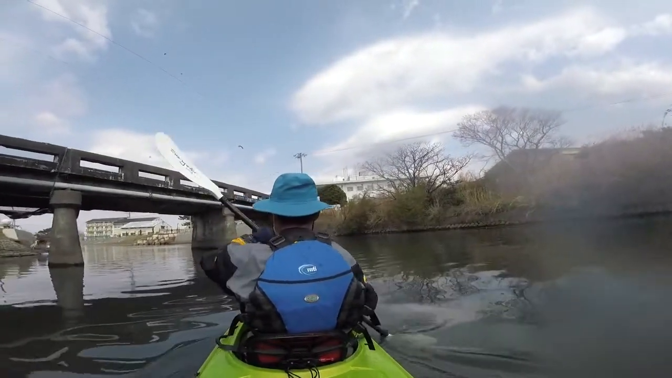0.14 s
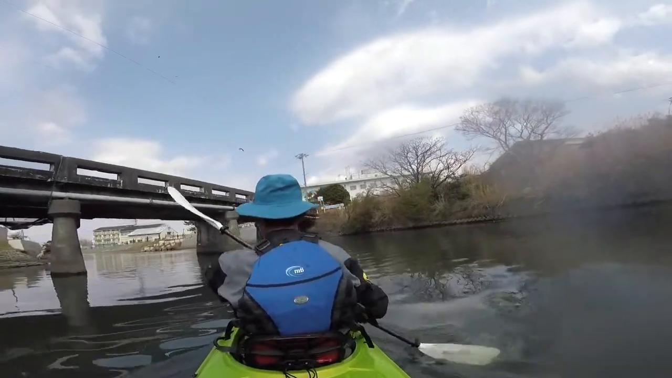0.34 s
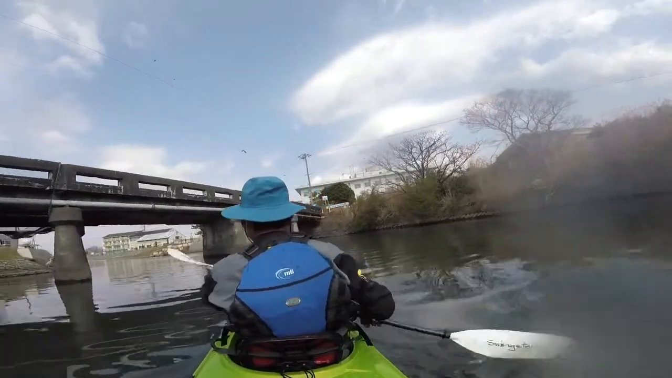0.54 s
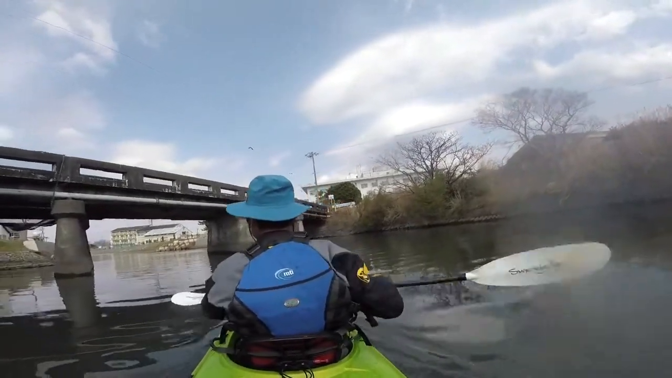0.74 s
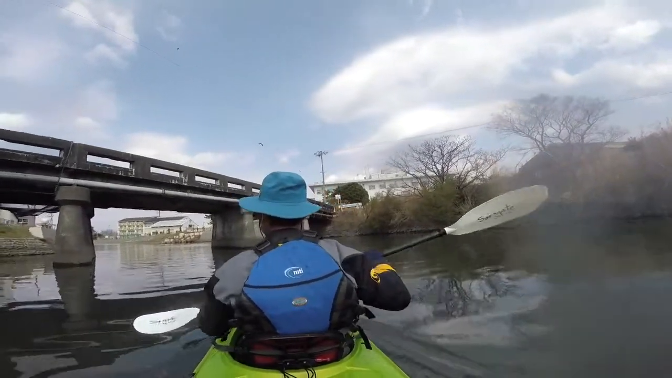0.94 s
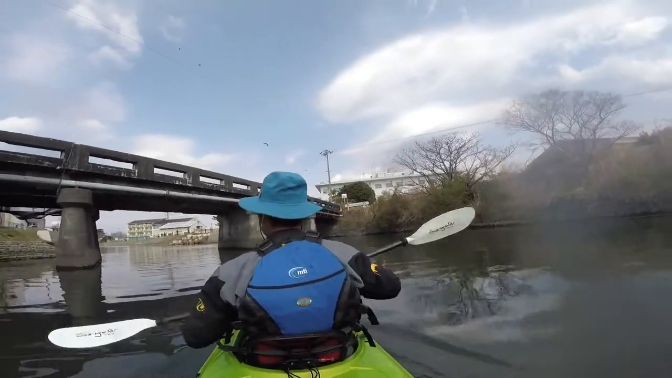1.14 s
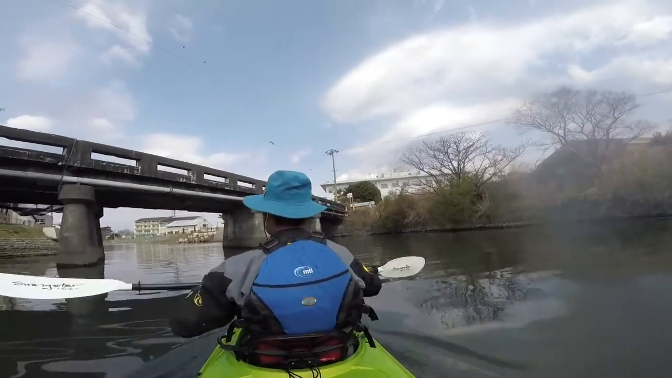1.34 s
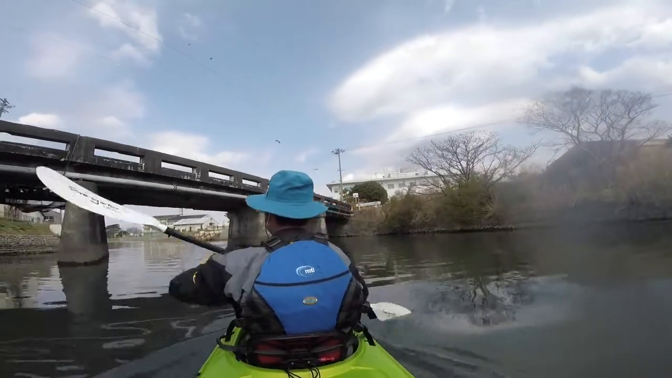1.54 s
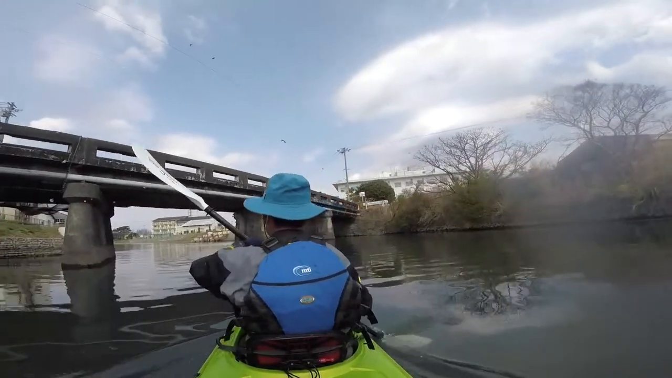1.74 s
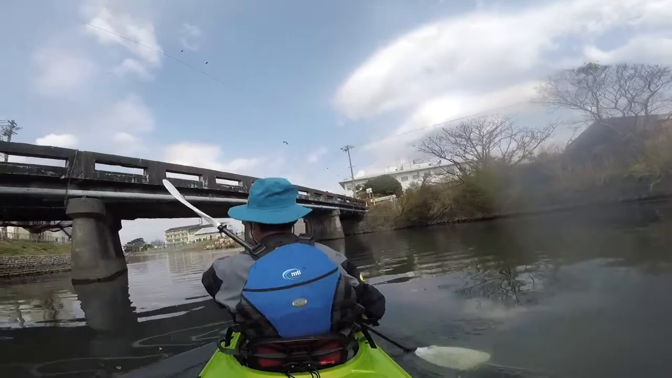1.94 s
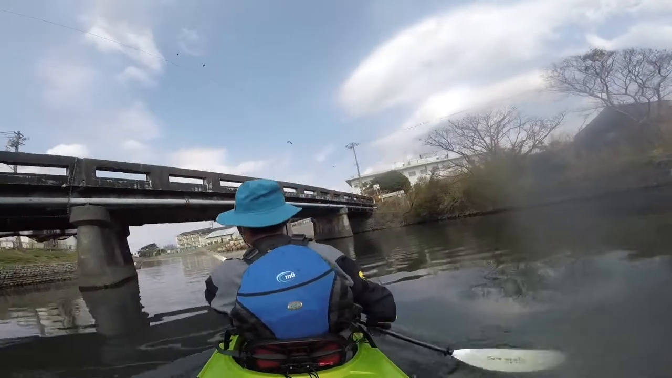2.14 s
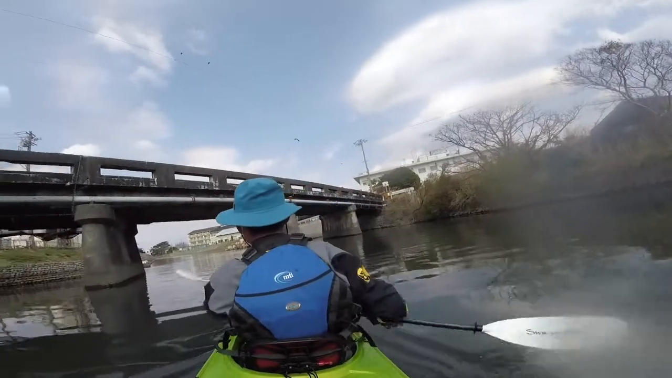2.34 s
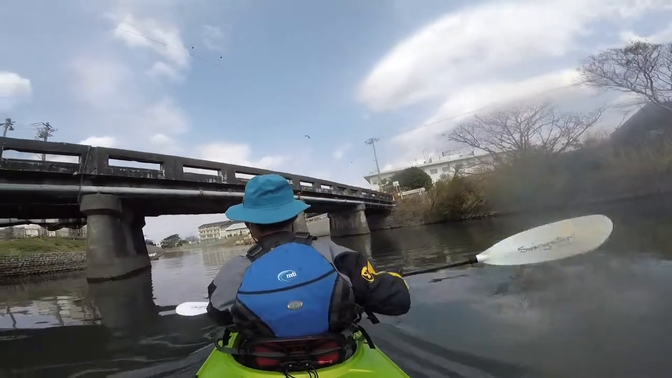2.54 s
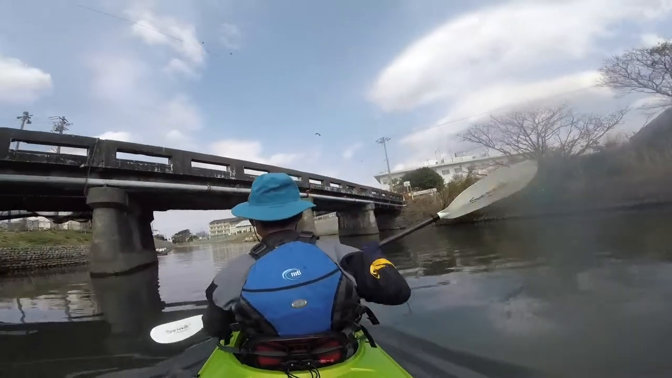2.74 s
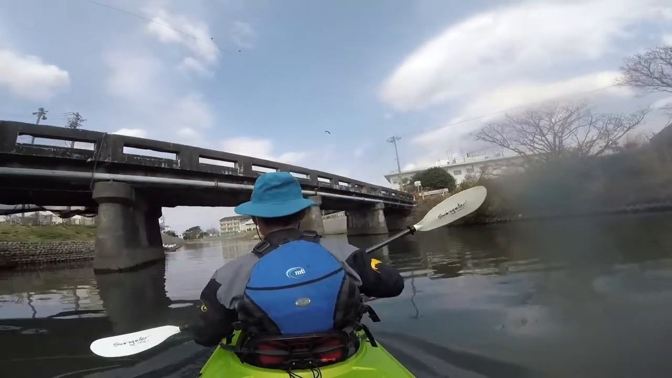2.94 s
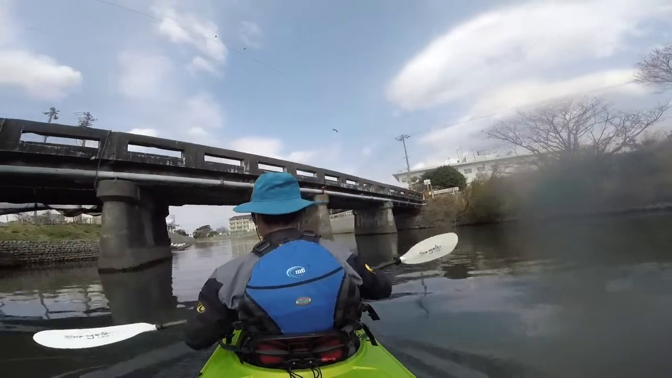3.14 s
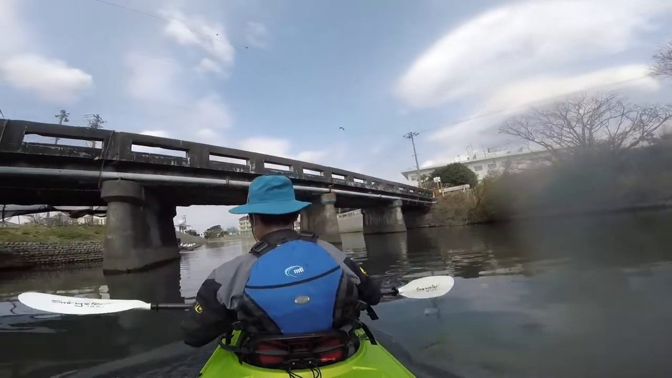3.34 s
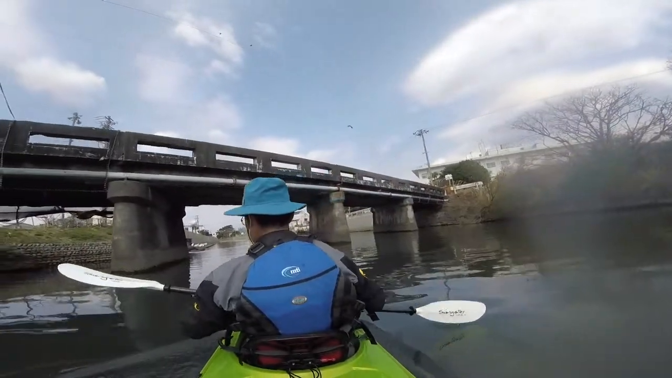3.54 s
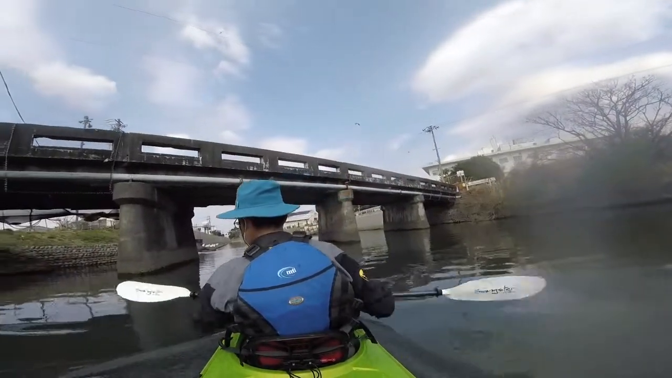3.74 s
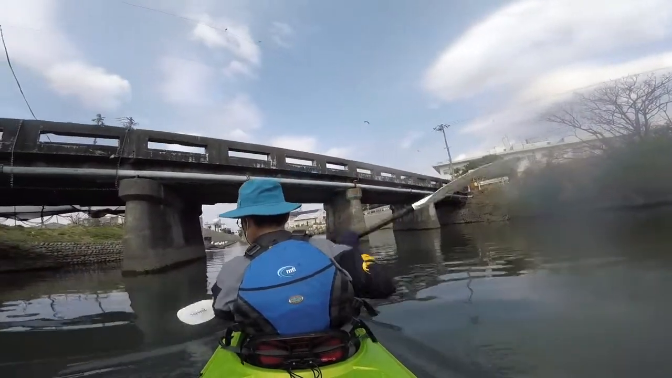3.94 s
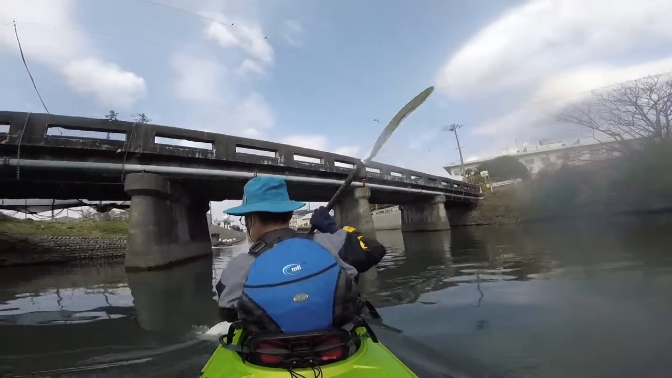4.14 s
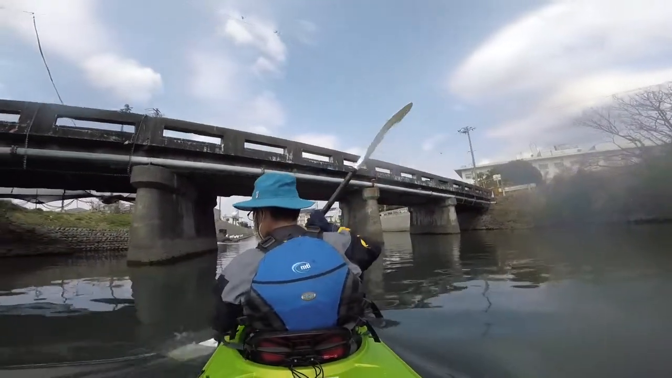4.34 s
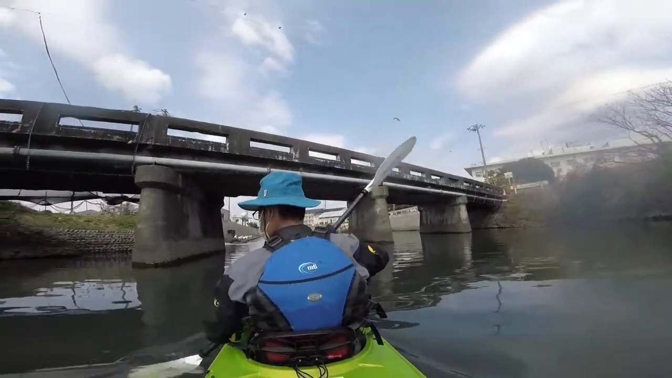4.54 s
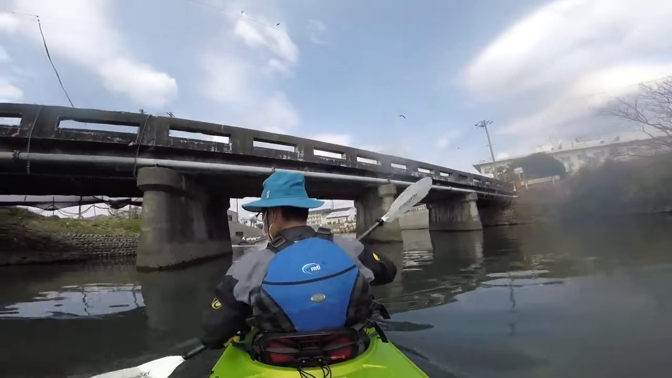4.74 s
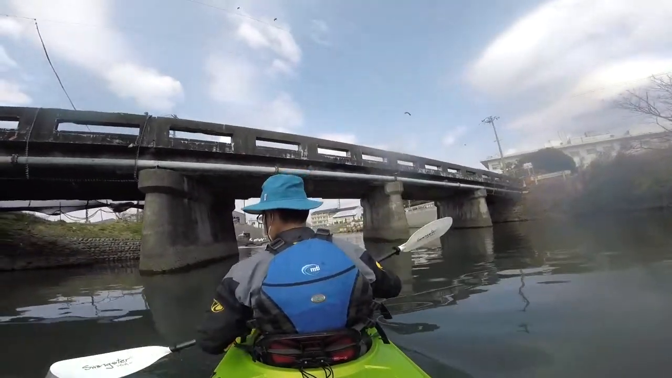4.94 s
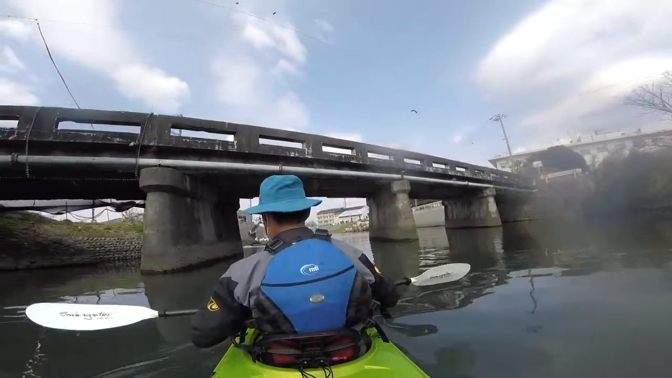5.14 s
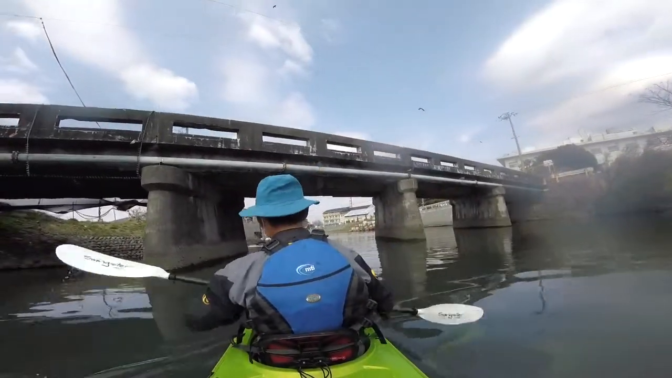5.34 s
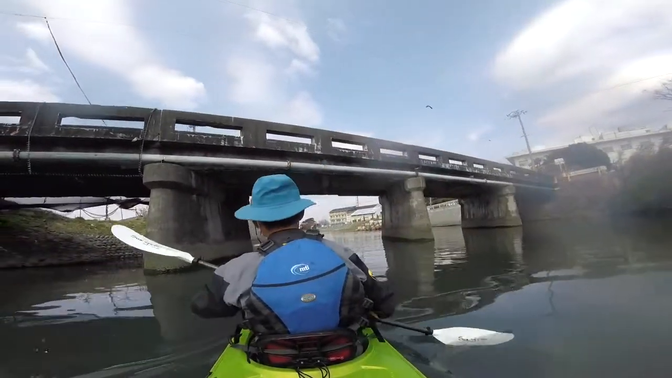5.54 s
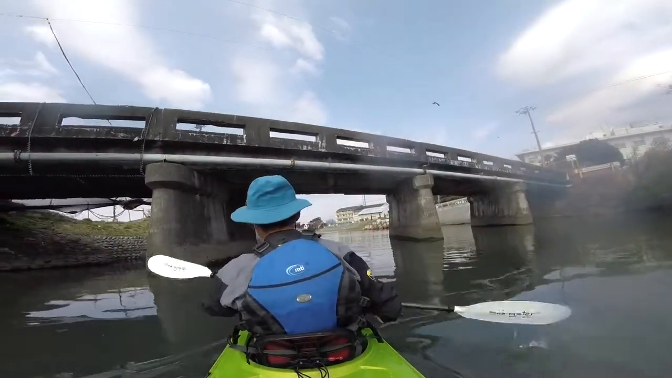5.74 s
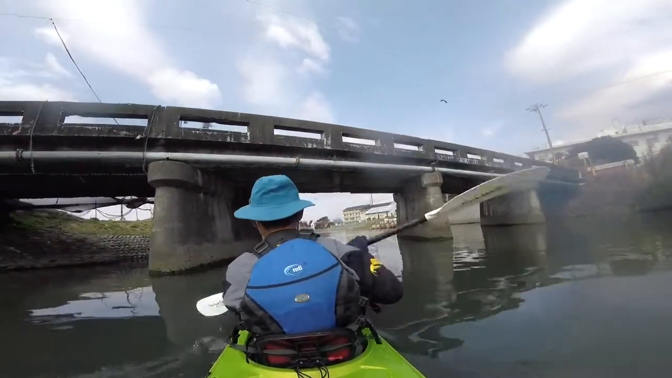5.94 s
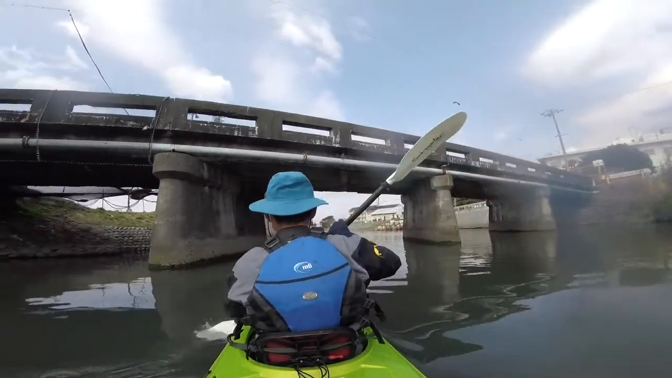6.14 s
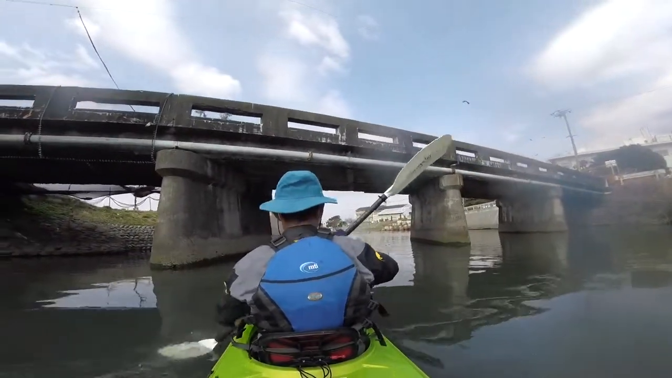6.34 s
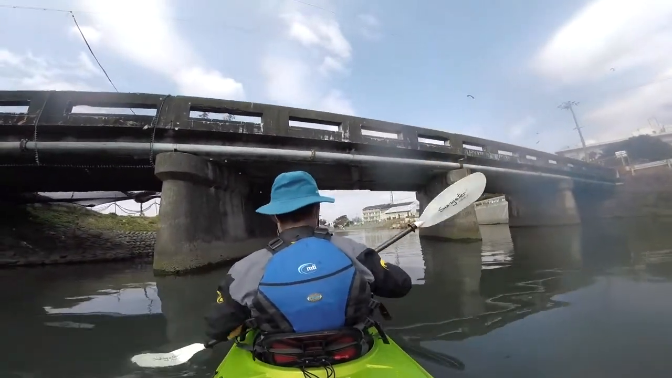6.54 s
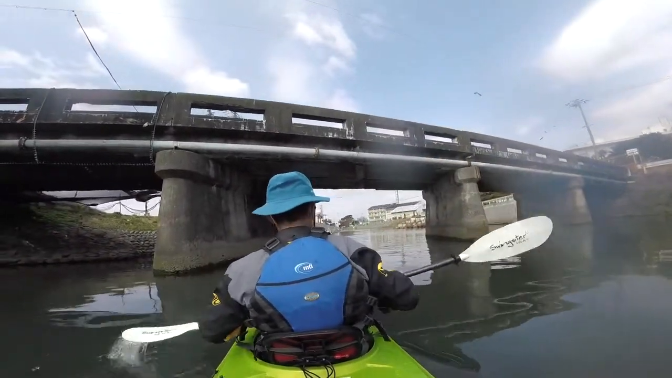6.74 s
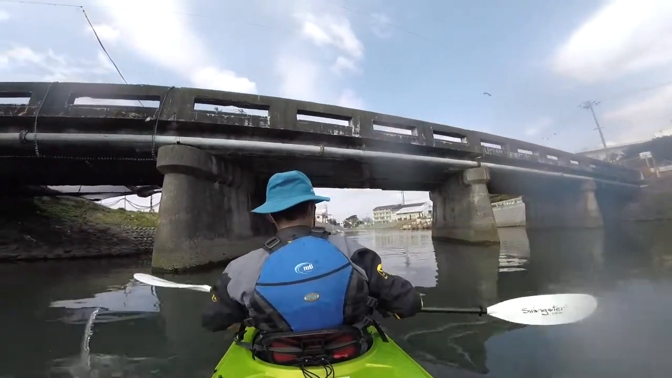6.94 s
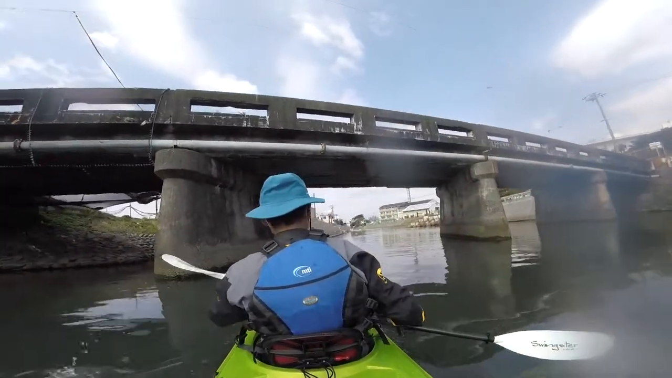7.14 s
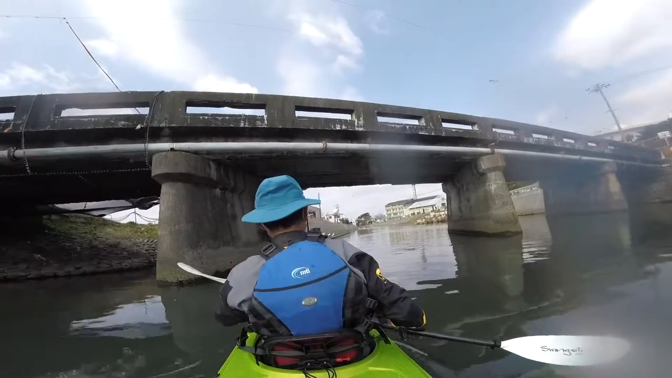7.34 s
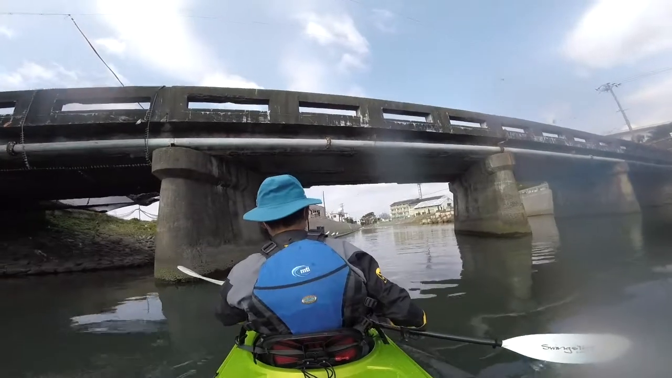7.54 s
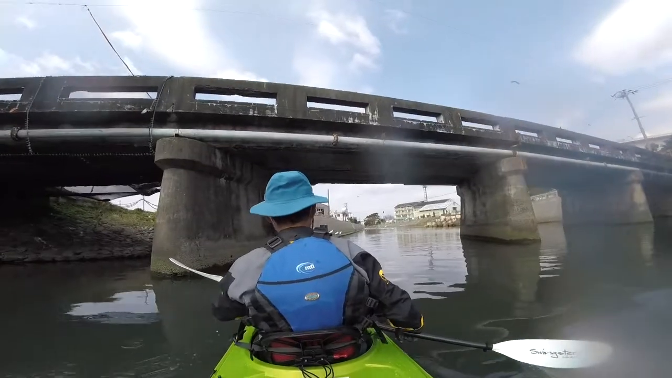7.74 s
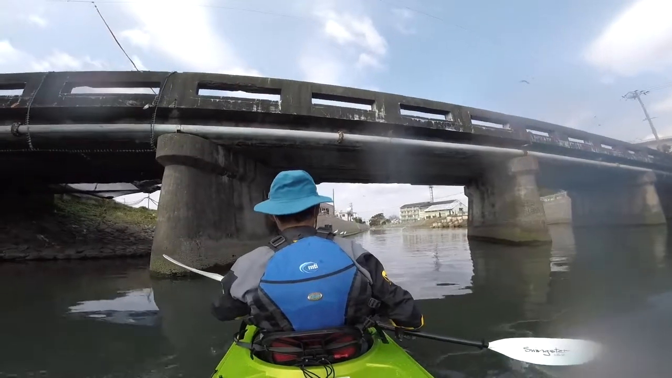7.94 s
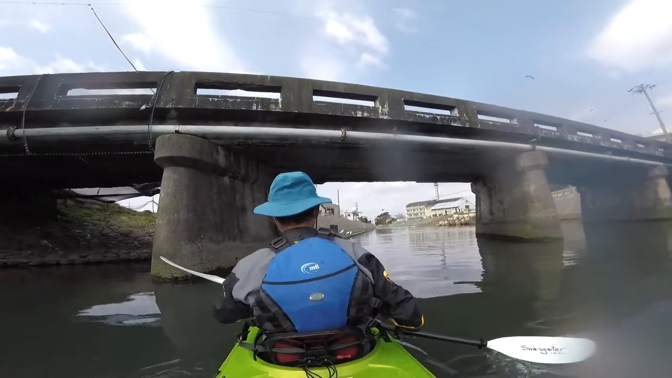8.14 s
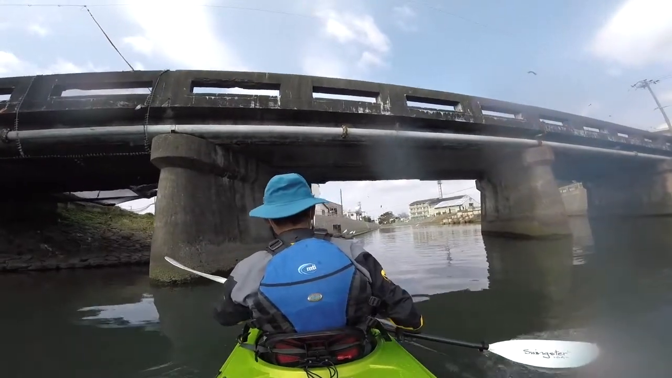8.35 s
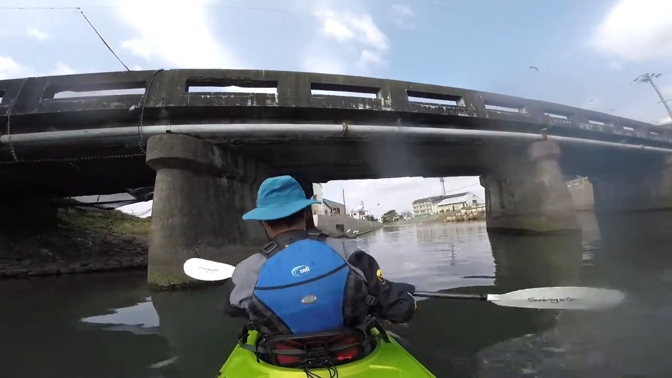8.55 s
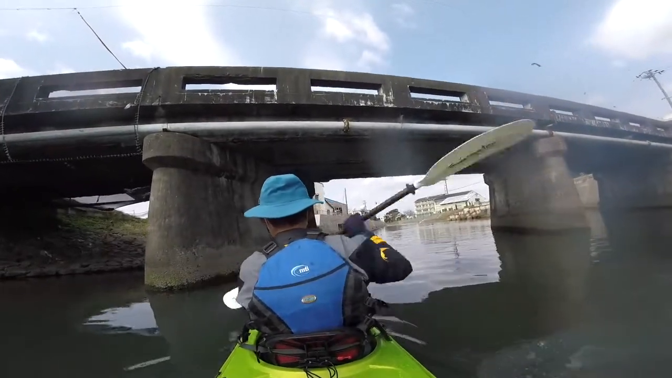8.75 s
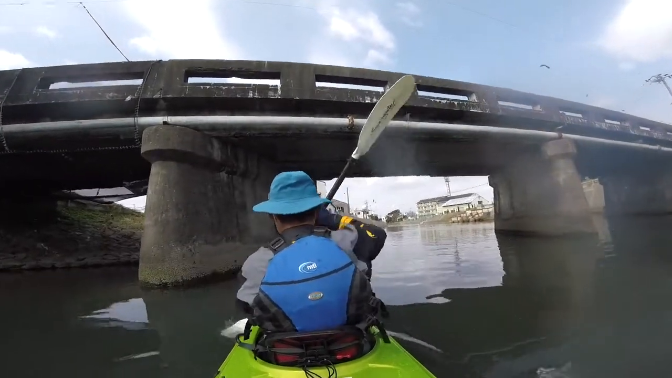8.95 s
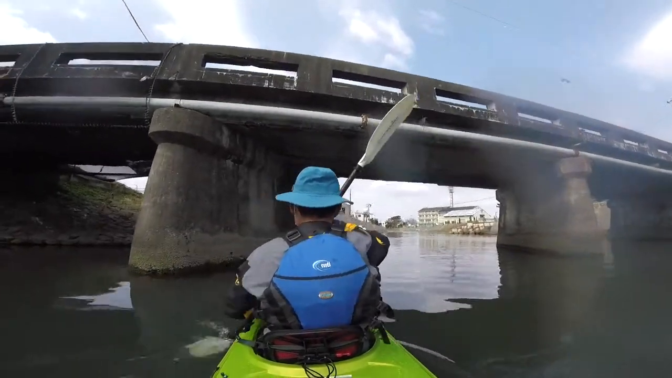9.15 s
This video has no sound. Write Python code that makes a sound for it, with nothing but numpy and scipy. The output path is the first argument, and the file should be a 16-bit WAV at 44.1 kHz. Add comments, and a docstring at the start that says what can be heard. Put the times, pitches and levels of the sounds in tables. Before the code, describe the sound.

Outdoor paddling heard from a microphone fixed to the boat: light hull taps and splashes first, then a burst of dull, boomy thumps, then quiet drips and plopping bubbles. More hard knocks follow mid-way, then a softer group, then a gliding lull of trickling water. A dense, loud flurry of hollow blows with small rattling ticks closes it, over wind buffeting and faint hiss.

```python
"""Kayak on a calm river

A paddler drives a plastic kayak; the microphone is fixed to the deck. Slaps and knocks ring decaying
hull and deck modes, flow keeps the modes sounding, water washes past as bubbly noise and sprays as fizz,
bubbles plop as gliding sines, droplets snap, a fitting ticks. Low noise buffets the microphone as wind,
a hum comes and goes over faint hiss, and a limiter ducks everything under the loudest blows."""
import sys
import numpy as np
from scipy import signal
from scipy.fft import rfft, irfft
from scipy.io import wavfile

SR = 44100
rng = np.random.default_rng(int(sys.argv[2]) if len(sys.argv) > 2 else 0)


def transcribe(u):
    """Save the signal u as a 16-bit wav file named by the first command-line argument.

    u: samples, shape (n,) or (channels, n), limited to [-1, 1]; the rate is SR.
    q: integer samples, one column per channel.
    """
    v = np.clip(np.atleast_2d(u).T, -1, 1)
    q = np.round(v * 32767).astype(np.int16)
    wavfile.write(sys.argv[1], SR, q)


N = 406161


def from_db(db):
    """Amplitude ratio of a level in dB."""
    return 10 ** (np.asarray(db) / 20)


def rms_one(x):
    """Scales x to rms 1."""
    return x / np.sqrt(np.mean(x ** 2) + 1e-20)


def peak_one(rows):
    """Scales each row to peak 1."""
    return rows / np.abs(rows).max(axis=1, keepdims=True)


def place(times_s, rows):
    """Adds one row of sound at each time."""
    out = np.zeros(N + rows.shape[1])
    for s, row in zip(times_s, rows):
        start = round(s * SR)
        out[start:start + len(row)] += row
    return out[:N]


def drift(corner_hz):
    """Slow random signal of rms 1: noise through two equal poles, made at SR / 40."""
    r = np.exp(-2 * np.pi * corner_hz * 40 / SR)
    noise = rng.standard_normal(N // 40 + 2002)
    slow = signal.lfilter([1], [1, -2 * r, r * r], noise)[2000:]   # settled part
    return np.interp(np.arange(N) / 40, np.arange(len(slow)), rms_one(slow))


def ring(push, hz, t60_s):
    """Two-pole resonator: a unit click starts a decaying sine of height 1."""
    r, w = from_db(-60 / (t60_s * SR)), 2 * np.pi * hz / SR
    return signal.lfilter([0, np.sin(w)], [1, -2 * r * np.cos(w), r * r], push + 1e-18)


def colour(x, response):
    """Filters x by (frequency [Hz], gain [dB]), -90 dB outside; rms 1."""
    hz, db = np.transpose(response)
    log_hz = np.log(np.arange(N // 2 + 1) * SR / N + 1)
    gain_db = np.interp(log_hz, np.log(hz), db, left=-90, right=-90)
    return rms_one(irfft(rfft(x) * from_db(gain_db), N))


def swells(calm_db, start_s, hold_s, peak_db, rise_db_per_s, fall_db_per_s):
    """Level in dB: events climb to a peak by start_s, hold and sink; powers add to the calm level."""
    t = np.arange(0, N, 32)[None] / SR
    columns = (start_s, hold_s, peak_db, rise_db_per_s, fall_db_per_s)
    start, hold, peak, rise, fall = (np.reshape(v, (-1, 1)) for v in columns)
    db = peak - rise * np.maximum(start - t, 0) - fall * np.maximum(t - start - hold, 0)
    power = (from_db(np.maximum(db, -200)) ** 2).sum(axis=0)
    return 10 * np.log10(np.interp(np.arange(N) / SR, t[0], power) + from_db(calm_db) ** 2)


def plops(times_s, level_db, hz, t60_s, rise_oct_per_s):
    """Bubbles: sines whose pitch glides ever faster, losing the same share every cycle."""
    t = np.arange(SR // 7) / SR
    pitch_hz = np.minimum(hz * 2 ** (rise_oct_per_s * t * (1 + t / 0.034)), SR / 5)
    cycles = np.cumsum(pitch_hz, axis=1) / SR
    burst = rng.standard_normal(cycles.shape) * np.exp(-t / 0.0036)
    tick = signal.lfilter([.4], [1, -.6], burst)   # born with a dull tick
    fade = from_db(-60 * cycles / (hz * t60_s)) * (1 - np.exp(-t * hz / 0.69))
    return place(times_s, from_db(level_db) * (np.sin(2 * np.pi * cycles) * fade + 0.15 * tick))


def grains(per_s, low_hz, high_hz, t60_cycles, spread_db):
    """Tiny bubbles burst at random, in clumps, and ring a few cycles; rms 1."""
    sizes = from_db(spread_db * np.minimum(rng.exponential(1, N), 5)) * rng.choice([-1, 1], N)
    born = rng.random(N) < per_s * from_db(3.5 * drift(12)) / SR
    pitches_hz = np.geomspace(low_hz, high_hz, 16)
    dealt = rng.integers(0, 16, N)
    return rms_one(sum(ring(sizes * born * (dealt == k), hz, t60_cycles / hz)
                       for k, hz in enumerate(pitches_hz)))


def cracks(rows, top_hz):
    """Droplets (time [s], peak [dB], pitch [Hz]): a brief crack, its noise band up to top_hz, plus a ring."""
    s, peak_db, pitch_hz = np.transpose(rows)
    t = np.arange(SR // 20) / SR
    crack = rng.standard_normal((len(s), len(t))) * np.exp(-t / 0.0034)
    broad = signal.sosfilt(signal.butter(4, [1800, top_hz], "band", fs=SR, output="sos"), crack)
    rings = peak_one(np.array([ring(c, hz, 20 / hz) for c, hz in zip(crack, pitch_hz)]))
    return place(s, from_db(peak_db)[:, None] * peak_one(0.4 * peak_one(broad) + rings))


# low hull modes: (frequency [Hz], relative level [dB], t60 [s])
HULL_MODES = [(161.4, -11.5, 0.18), (198.6, -5, 0.04), (228.2, 5, 0.042), (280, 5, 0.067), (315, 5, 0.088),
              (400, -3.5, 0.043)]
# blows of water and gear: (time [s], hull peak [dB], air pocket pitch [Hz], push time scale [s],
# deck peak [dB])
BLOWS = [(0.04, -13.5, 254, 0.0033, -25), (0.172, -26, 305, 0.0063, -36), (0.349, -29.5, 299, 0.009, -26),
         (.763, -19.5, 385, 0.0035, -40.5), (0.852, -10.5, 315, 0.0027, -35),
         (0.988, -17, 331, 0.0055, -21), (1.165, -16, 226, 0.0093, -31), (1.265, -16, 155, 0.0045, -50),
         (1.355, -19.5, 181, 0.0076, -34), (1.449, -20, 214.6, 0.032, -49), (1.518, -19, 212, 0.012, -41),
         (1.68, -3.5, 174.6, 0.017, -17), (1.693, 3.5, 233, 0.0035, -12), (1.711, -2.5, 264, 0.012, 3.5),
         (1.729, -28, 270, 0.0045, -19), (1.748, -19, 200, 0.0089, -18), (1.79, -5, 351, 0.0061, -11),
         (1.818, -10, 304, 0.0029, -19), (1.871, -11.5, 168, 0.0031, -27), (1.913, -18, 340, 0.011, -20.5),
         (1.974, -23.5, 337, 0.012, -39), (2.528, -26, 286.3, 0.02, -26), (4.096, 0, 258, 0.015, -12),
         (4.137, -9.5, 302, 0.011, -32), (4.353, -4, 248, 0.01, -16.5), (4.38, -1, 264, 0.0058, -1.5),
         (4.403, -4, 188, 0.0037, -16), (4.429, -14, 346, 0.013, -37), (4.46, -25, 326, .006, -17),
         (4.47, -13, 338, 0.0034, -12), (4.51, 5.5, 291, 0.0034, -2), (4.532, 6, 233, 0.007, -8),
         (4.567, -15, 315, 0.0047, -19), (4.605, -11.5, 313, 0.0029, -24), (4.794, -10, 352, 0.0045, -14),
         (5.194, -18.5, 266, 0.0053, -20.5), (6.067, -14, 262, 0.011, -35), (6.089, -11, 260.6, 0.02, -10),
         (6.106, -6, 373, 0.0042, -10), (6.143, -14.5, 356, 0.0073, -24), (6.176, -19, 258, 0.01, -27),
         (6.19, -23, 302, 0.0049, -22.5), (6.22, -13, 315, 0.0028, -16.5), (6.439, -10.5, 340, 0.0013, -14),
         (6.558, -43, 300, 0.0014, -20.5), (6.576, -12, 214.7, 0.012, -26), (6.586, -13, 234.6, 0.012, -48),
         (6.737, -13, 250, 0.014, -34), (6.748, -4, 241, 0.004, -19), (6.903, -19.5, 237, 0.0068, -22.5),
         (7.008, -17.5, 315, 0.0037, -14), (8.603, -24.5, 269, 0.02, -51), (8.843, 5, 231.7, 0.0087, -11.5),
         (8.867, 7, 210, 0.0037, 7), (8.884, 7.5, 300, 0.0036, -39), (8.907, 1, 350, 0.013, -14),
         (8.949, 4, 290, 0.0013, 7.5), (8.969, -5, 318, 0.003, 5.5), (8.994, -14, 296, 0.0091, -10.5),
         (9.02, 7, 192, 0.011, -7), (9.035, 7, 245, 0.0027, 2), (9.048, -12.5, 174, 0.011, 10),
         (9.057, -28, 194, 0.007, 4), (9.067, -23, 200, 0.0042, -3.5), (9.097, 0.5, 200, 0.0021, -7.5),
         (9.12, 3, 315, 0.0034, 4), (9.204, -0.5, 462, 0.0053, -12)]


def thumps():
    """An air pocket squeezed on the hull pulses at its own pitch and drives the low modes near it."""
    s, peak_db, pocket_hz, push_s, _ = np.transpose(BLOWS)[:, :, None]
    t = np.arange(SR // 4) / SR
    age = t / np.clip(push_s, .001, .06)
    rough = rng.standard_normal((len(BLOWS), len(t)))
    push = (np.sin(2 * np.pi * pocket_hz * t) + 6.36 * rough) * age ** 0.88 * np.exp(-age)
    rings = sum(ring(push, hz, t60_s) * from_db(db - 62 * np.log2(hz / pocket_hz) ** 2)
                for hz, db, t60_s in HULL_MODES)
    return place(s[:, 0], from_db(peak_db) * peak_one(rings))


# upper deck modes: (frequency [Hz], relative level [dB], t60 [s])
DECK_MODES = [(486, 0.5, 0.051), (620, 14.5, 0.017), (820.6, 15, 0.049), (971.4, 15, 0.028),
              (1253, -1.5, 0.037), (1490, 5, 0.021), (2200, 2.5, 0.01), (2870, -2.5, 0.012),
              (3400, -1.5, 0.01)]


def taps():
    """First contact, then a dying patter of soft clicks, rings the deck; wet and flexed, its pitch varies."""
    s, _, _, push_s, peak_db = np.transpose(BLOWS)[:, :, None]
    patter_s = (.006 + .9 * push_s) * np.exp(-.025 * (peak_db + 18.5))   # harder blows are crisper
    t = np.arange(SR // 6) / SR
    shape = (len(s), len(t))
    clicks = rng.standard_normal(shape) * (rng.random(shape) < 1000 / SR)   # 1000 clicks per s
    clicks[:, 0] = 1.2   # first contact
    soft = np.exp(-2 * np.pi * 1800 / SR)   # wet contact: little treble
    clicks = clicks * np.exp(-t / np.clip(patter_s, .001, .05))
    patter = signal.lfilter([1], [1, -2 * soft, soft ** 2], clicks)
    rings = sum(ring(patter, hz, t60_s) * from_db(db + rng.normal(0, 2.5, s.shape))
                for hz, db, t60_s in DECK_MODES)
    rings = np.array([np.interp(t * rng.uniform(.96, 1.04), t, row) for row in rings])
    rings = signal.sosfilt(signal.butter(4, 3900, fs=SR, output="sos"), rings)   # just over the top mode
    return place(s[:, 0], from_db(peak_db) * peak_one(rings))


def thrown_droplets():
    """Each blow throws a dull droplet, louder after a harder deck blow."""
    pitch_hz = 3420 * rng.uniform(.8, 1.05, len(BLOWS))
    rows = [(blow[0], -42.5 + 0.4 * blow[-1], hz) for blow, hz in zip(BLOWS, pitch_hz)]
    return cracks(rows, top_hz=3900)


# small metal fitting on the deck: (frequency [Hz], relative level [dB], t60 [s])
FITTING_MODES = [(3400, 4.5, .012), (5160, 5.5, 0.033), (6240, -1.5, .018)]
# its rattles under hard blows: (time [s], peak [dB])
RATTLES = [(4.379, -36), (4.532, -33), (8.868, -31), (8.908, -27), (8.951, -38), (9.035, -32), (9.048, -36),
           (9.121, -44)]


def ticks():
    """A brief noise touch rings the fitting's modes."""
    s, peak_db = np.transpose(RATTLES)
    t = np.arange(SR // 10) / SR
    touch = rng.standard_normal((len(s), len(t))) * np.exp(-t / .0006)
    rings = sum(ring(touch, hz, t60_s) * from_db(db) for hz, db, t60_s in FITTING_MODES)
    return place(s, from_db(peak_db)[:, None] * peak_one(rings))


# lurches of the boat: (peak start [s], hold [s], drag level [dB], wind level [dB])
LURCHES = [(0.49, 0.45, -38, -85), (1.163, 0.45, -31, -77), (1.695, 0.19, -21, -15.5),
           (4.098, 0.074, -24.5, -29), (4.362, 0.34, -49, -20), (6.066, 0.018, -31, -26),
           (8.868, 0.27, -18, -18)]
LURCH_RISE_DB_PER_S = 490


def drag():
    """Turbulent flow along the hull keeps its low modes and the deck modes below 1400 Hz sounding."""
    s, hold_s, peak_db, _ = np.transpose(LURCHES)
    level_db = swells(-38, s, hold_s, peak_db, LURCH_RISE_DB_PER_S, fall_db_per_s=96.5)
    flow = rng.standard_normal(N) * from_db(1.5 * drift(10))
    hull = sum(ring(flow, hz, t60_s) * from_db(1.84 * db - 41.0 * np.log2(hz / 200) + drift(7.8))
               for hz, db, t60_s in HULL_MODES)
    deck = sum(ring(flow, hz, t60_s) * from_db(1.5 * db) for hz, db, t60_s in DECK_MODES if hz < 1400)
    return from_db(level_db) * (rms_one(hull) + from_db(-19) * rms_one(deck))


# splashes and trickles off the blades: (peak time [s], wash level [dB], spray level [dB],
# rise [dB/s], fall [dB/s])
SPLASHES = [(0.489, -34.5, -48, 131.5, 53), (0.859, -31.5, -37.5, 93.5, 139), (1.72, -34.5, -45, 296, 59.5),
            (2.201, -42, -49.5, 58, 43.5), (2.541, -46, -45.5, 63, 98.5), (4.092, -35.5, -47, 211, 303.5),
            (4.381, -46.5, -66, 156.5, 84), (4.521, -41.5, -63, 145.5, 53.5), (5.17, -65.5, -55.5, 84, 79),
            (6.021, -51.5, -48, 42, 118.5), (6.93, -45, -51, 122.5, 36), (7.099, -50, -45, 53, 118.5),
            (7.501, -40.5, -50, 66.5, 31.5), (7.88, -45, -49, 25.5, 12), (8.652, -44, -46, 39, 34.5),
            (8.82, -37.5, -40.5, 52, 138), (8.922, -31, -70, 249.5, 121), (9.052, -31.5, -61.5, 384.5, 599)]
# wash filter: (frequency [Hz], gain [dB])
WASH_RESPONSE = [(240, -52), (400, 1), (515, -5.5), (773, -3), (1050, -1.5), (1420, -0.5), (1830, -4),
                 (3700, -12), (4700, -20), (6500, -33.5), (9900, -120)]


def wash():
    """Ringing bubble grains plus noise swell with each splash; gurgles follow the level."""
    s, peak_db, _, rise, fall = np.transpose(SPLASHES)
    level_db = swells(-47.5, s, 0, peak_db, rise, fall)
    bubbly = grains(2200, 520, 3800, t60_cycles=28, spread_db=4) + rng.standard_normal(N)
    return from_db(level_db + drift(8)) * colour(bubbly, WASH_RESPONSE) + gurgles(level_db)


def gurgles(wash_db):
    """Larger bubbles rise at random, more often in strong wash, and glide upward."""
    when, size, pitch, glide = np.transpose(rng.random((420, 4)))[:, :, None]
    share = np.cumsum(from_db(np.minimum(wash_db, -38)))
    times_s = np.interp(when[:, 0], share / share[-1], np.arange(N) / SR)
    hz = 480 * 2 ** (2.6 * pitch)
    level_db = wash_db[(times_s * SR).astype(int), None] + 8 - 12 * size - 6 * pitch
    return plops(times_s, level_db, hz, 36 / hz, rise_oct_per_s=16 * glide ** 2)


# spray filter: (frequency [Hz], gain [dB])
SPRAY_RESPONSE = [(1200, -10.5), (2000, 5), (3300, 3), (4700, -1.5), (6500, 1.5), (8500, -6), (10500, 0),
                  (12000, -71), (15000, -29.5)]


def spray():
    """Fine fizz of high grains plus noise swells with each splash; drops follow the level."""
    s, _, peak_db, rise, fall = np.transpose(SPLASHES)
    level_db = swells(-58.5, s, 0, peak_db, rise, fall)
    fizz = grains(2600, 1500, 11000, t60_cycles=20, spread_db=4.5) + .5 * rng.standard_normal(N)
    return from_db(level_db + 1.5 * drift(25)) * colour(fizz, SPRAY_RESPONSE) + drops(level_db)


def drops(spray_db):
    """Small drops patter at random moments and pitches, louder where the spray is strong."""
    when, size, pitch, life = np.transpose(rng.random((700, 4)))[:, :, None]
    times_s = when[:, 0] * (N - 1) / SR
    hz = 900 * 2 ** (3 * pitch ** 1.4)
    level_db = spray_db[(times_s * SR).astype(int), None] + 19 - 14 * size - 9 * pitch
    return plops(times_s, level_db, hz, (15 + 45 * life) / hz, rise_oct_per_s=hz / 250)


# bubbles and drops that stand out: (time [s], level [dB], starting pitch [Hz],
# t60 at starting pitch [s], initial pitch rise [octaves/s])
BUBBLES = [(.241, -7.5, 2200, 0.0033, -11), (.48, -27.5, 756, 0.1, 2.5), (.798, -30, 700, 0.023, 4),
           (.975, -27, 570, 0.14, -1.5), (1.563, -26, 2200, 0.019, -8), (2.12, -32, 1060, 0.097, -6),
           (2.215, -31.5, 723, 0.24, 14), (2.205, -28, 1165, 0.065, -12), (2.275, -26, 990, 0.022, 14),
           (2.385, -33, 675, 0.097, 0.5), (2.468, -28, 1150, 0.041, 28), (2.511, -24, 503, 0.068, -1),
           (2.792, -28, 910, 0.059, 17), (2.876, -35.5, 555, 0.086, 1), (2.881, -38, 1000, .12, -1),
           (2.914, -27.5, 870, 0.058, 4), (2.965, -35.5, 810, 0.25, 3.5), (3.02, -34, 598, 0.17, 1),
           (3.022, -34.5, 694, 0.28, 18.5), (3.061, -35, 1470, .08, 22), (3.097, -42, 1900, 0.053, -2),
           (3.09, -37.5, 608, 0.2, 1), (3.308, -31.5, 568, 0.1, 2.5), (3.41, -32, 696, 0.1, -3),
           (3.441, -28, 505, 0.12, 13), (3.725, -27.5, 640, 0.081, -4), (3.96, -30.5, 547, 0.15, 4.5),
           (4.042, -24.5, 587, 0.051, -1), (4.067, -8, 1710, 0.0058, 10), (4.832, -35, 690, 0.078, 20),
           (4.878, -39, 688, 0.11, 20), (4.917, -40, 1150, 0.073, 24), (5.103, -42, 1490, .08, -8),
           (5.303, -40, 1110, .07, 8), (5.8, -17, 1440, 0.012, 11), (7.061, -11.5, 1400, 0.0045, 22),
           (7.137, -22.5, 1243, 0.071, 45), (7.49, -34, 556, 0.32, 20.5), (7.414, -24, 585, 0.06, 8),
           (7.596, -23.5, 1064, 0.073, 0.5), (8.64, -25.5, 2820, 0.024, 4), (8.655, -26.5, 840, 0.083, 1),
           (8.254, -23, 1830, 0.019, 0), (8.803, -20, 1240, 0.024, 11)]


def bubbles():
    """Single bubbles plop as dying, gliding sines."""
    s, *settings = np.transpose(BUBBLES)[:, :, None]
    return plops(s[:, 0], *settings)


# flying droplets that stand out: (time [s], peak [dB], pitch [Hz])
SNAPS = [(.416, -30.5, 3200), (.427, -32, 2680), (0.4575, -38, 4330), (.472, -28.5, 2820),
         (.747, -35, 6900), (.8855, -34, 7250), (.906, -27.5, 4100), (.976, -33, 2920),
         (1.094, -30.5, 2980), (1.506, -33, 2100), (1.6815, -26.5, 2900), (1.808, -29, 2600),
         (1.936, -27, 1730), (2.113, -31, 2200), (2.192, -33.5, 4170), (2.55, -28.5, 2320),
         (2.557, -33.5, 5540), (.8011, -24, 2420), (2.4813, -28, 3680), (2.529, -24.5, 4050),
         (2.588, -32, 2520), (2.9787, -33.5, 3800), (4.0646, -31, 2690), (4.081, -39, 6000),
         (4.0978, -21, 3600), (4.473, -39, 3540), (4.503, -36, 3800), (4.5095, -22.5, 2870),
         (4.532, -22, 3350), (4.567, -39, 3500), (4.608, -39.5, 4600), (4.617, -36.5, 3480),
         (5.922, -32, 5740), (5.9847, -32, 3680), (6.034, -26, 3300), (6.048, -31, 2700),
         (7.059, -27.5, 3180), (7.152, -33, 2310), (7.23, -32.5, 6200), (7.392, -34.5, 3830),
         (7.429, -33, 6640), (7.498, -34, 3400), (7.6, -39, 4200), (8.522, -31, 2530), (8.7764, -30, 3300),
         (8.807, -20, 3550), (8.908, -33, 2950), (9.02, -31, 5500)]


def snaps():
    """Droplets snap on water and deck: bright cracks with short rings."""
    return cracks(SNAPS, top_hz=8200)


# wind noise spectrum: (frequency [Hz], relative density [dB/Hz])
WIND_SPECTRUM = [(18, -5), (32, -2.5), (60, -1.5), (100, -0.5), (140, -2), (250, -21)]
# wind between the lurches: (time [s], level [dB])
BREEZE = [(0, -72), (1.39, -59), (1.45, -29.5), (2.1, -31), (3.5, -38.5), (4.05, -44.5), (4.4, -34.5),
          (5.4, -29.5), (6.04, -39.5), (6.3, -33), (7.05, -39), (7.1, -48), (8.0, -57.5), (8.8, -65.5),
          (9.05, -16.5)]


def wind():
    """Lumpy noise pressure on the microphone port jumps at lurches; light air only rocks it slowly."""
    s, hold_s, _, peak_db = np.transpose(LURCHES)
    gust_db = swells(-120, s, hold_s, peak_db, LURCH_RISE_DB_PER_S, fall_db_per_s=77.5)
    lumpy = colour(rng.standard_normal(N), WIND_SPECTRUM) * from_db(drift(1.0))
    slow = signal.sosfilt(signal.butter(2, 56.5, fs=SR, output="sos"), lumpy)
    breeze_db = np.interp(np.arange(N) / SR, *np.transpose(BREEZE))
    return from_db(gust_db) * rms_one(lumpy) + from_db(breeze_db) * rms_one(slow)


# swells of the hum: (peak start [s], hold [s], level [dB])
HUMS = [(2.332, 0.047, -39), (2.935, 0.045, -34), (3.276, 0.11, -36), (3.63, 0.18, -33)]


def hum():
    """A low sine comes and goes, its pitch wavering slightly."""
    level_db = swells(-120, *np.transpose(HUMS), rise_db_per_s=182, fall_db_per_s=99)
    pitch_hz = 151.5 * (1 + 0.0094 * drift(1.96))
    return np.sqrt(2) * from_db(level_db) * np.sin(2 * np.pi * np.cumsum(pitch_hz) / SR)


# hiss spectrum: (frequency [Hz], relative density [dB/Hz])
HISS_SPECTRUM = [(1470, -10), (2500, -10.5), (3640, -14), (4550, -16.5), (5880, -12.5), (6580, -10),
                 (9010, -13), (14200, -22), (15000, -16)]


def hiss():
    """Steady coloured noise."""
    return from_db(-57.5) * colour(rng.standard_normal(N), HISS_SPECTRUM)


def scene():
    """The recorder's wind filter cuts boat and water below about 130 Hz; wind, hum and hiss are added."""
    boat = thumps() + taps() + thrown_droplets() + ticks() + drag()
    water = wash() + spray() + bubbles() + snaps()
    wind_filter = signal.butter(7, 132.6, "high", fs=SR, output="sos")
    return (signal.sosfiltfilt(wind_filter, boat + water) + wind() + hum() + hiss())[None]


def roll_off(x):
    """The treble ends steeply here."""
    return signal.sosfilt(signal.butter(12, 15190, fs=SR, output="sos"), x)


def record(dry):
    """A limiter ducks loud blows and lets go slowly; peaks are rounded, the covered port dulls the top."""
    limit_db, overshoot_fall_db_per_s, smoothing_s = -3.5, 25, 0.0037
    over_db = np.maximum(20 * np.log10(np.abs(dry[0]) + 1e-9) - limit_db, 0)
    slope_db = overshoot_fall_db_per_s * np.arange(N) / SR
    held_db = np.maximum.accumulate(over_db + slope_db) - slope_db
    r = np.exp(-1 / (smoothing_s * SR))
    ducked = dry * from_db(-.7 * signal.lfilter([1 - r], [1, -r], held_db))
    rounded = 0.93 * np.tanh(ducked / 0.95)
    port = signal.butter(1, 11000, fs=SR, output="sos")
    return roll_off(signal.sosfilt(port, rounded))


dry = scene()
out = record(dry)
transcribe(out)
```